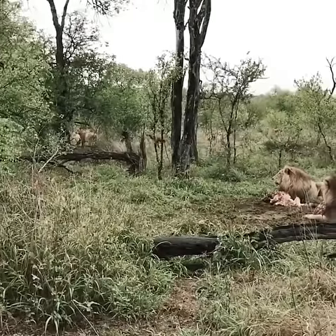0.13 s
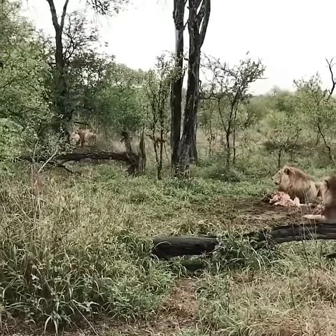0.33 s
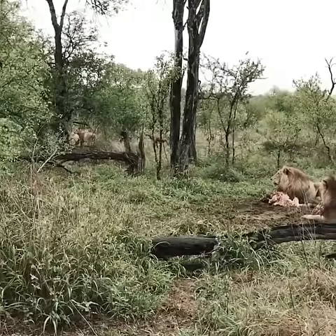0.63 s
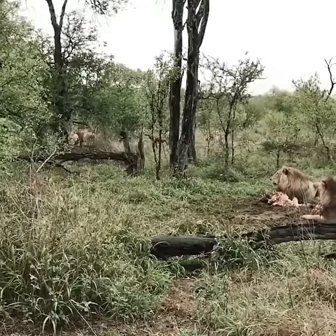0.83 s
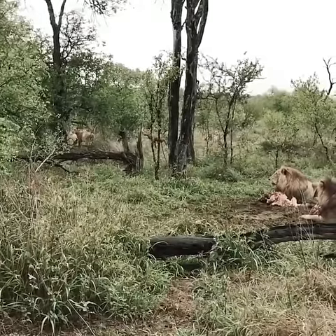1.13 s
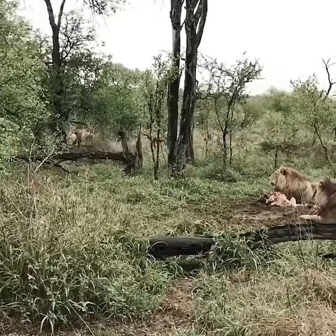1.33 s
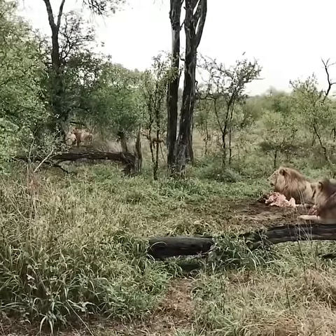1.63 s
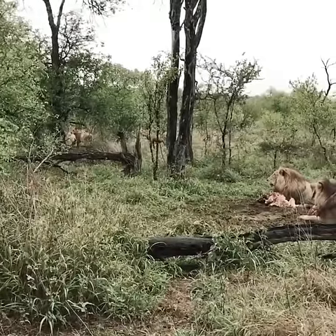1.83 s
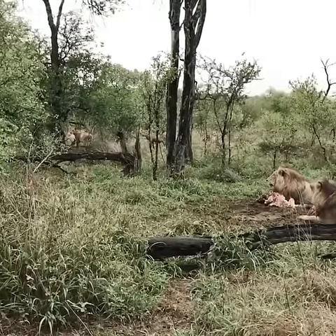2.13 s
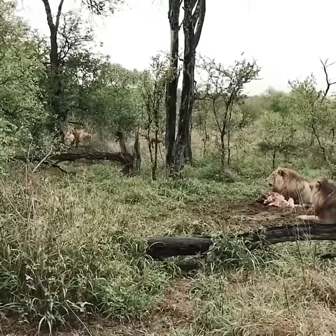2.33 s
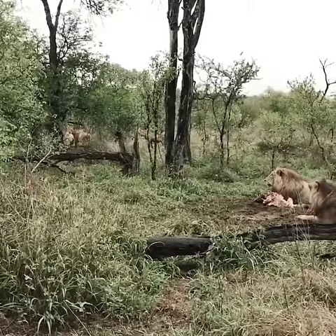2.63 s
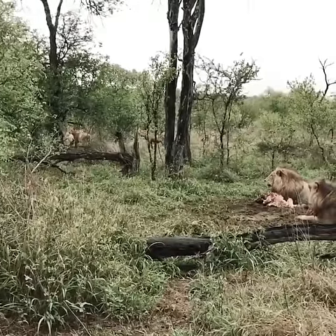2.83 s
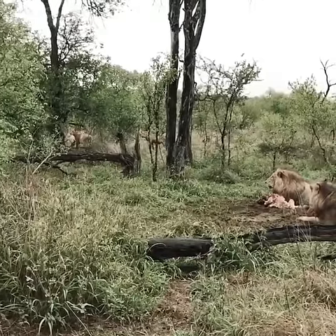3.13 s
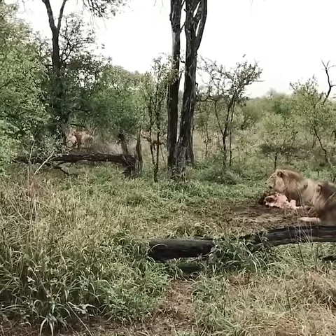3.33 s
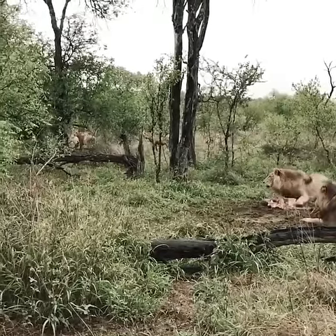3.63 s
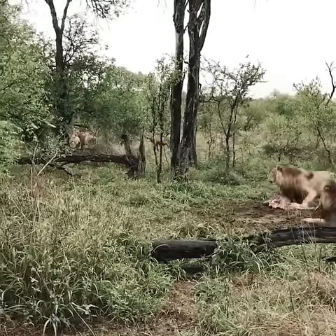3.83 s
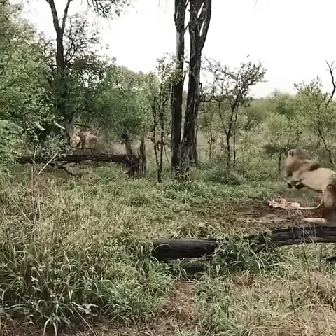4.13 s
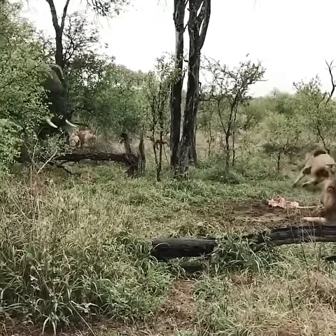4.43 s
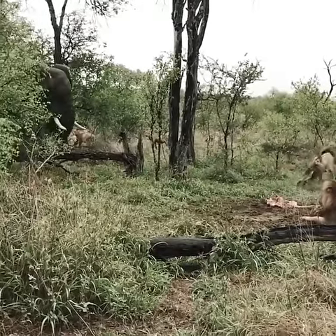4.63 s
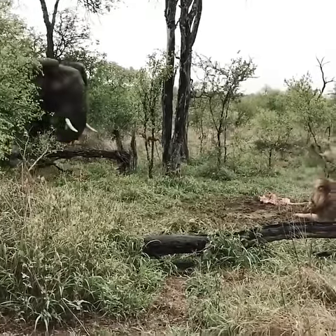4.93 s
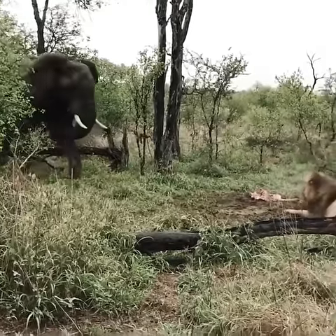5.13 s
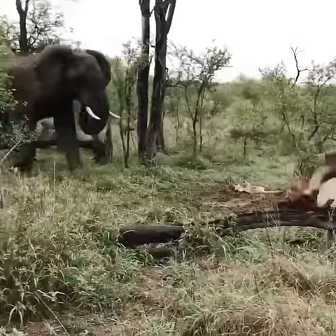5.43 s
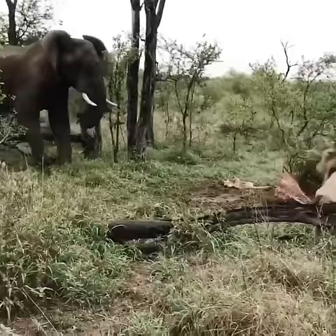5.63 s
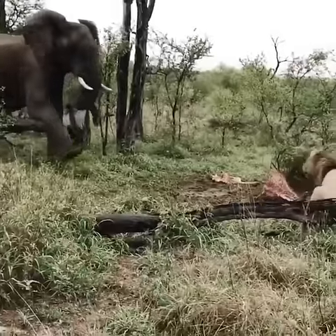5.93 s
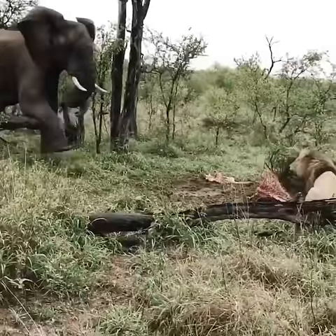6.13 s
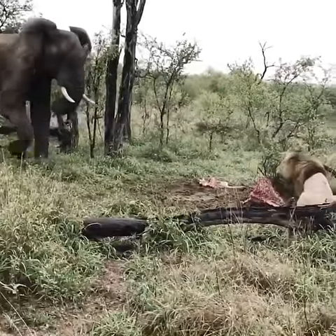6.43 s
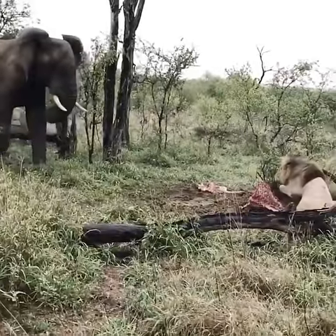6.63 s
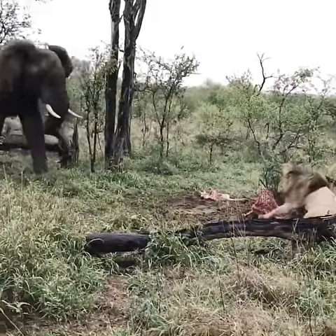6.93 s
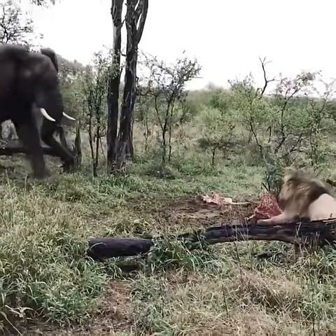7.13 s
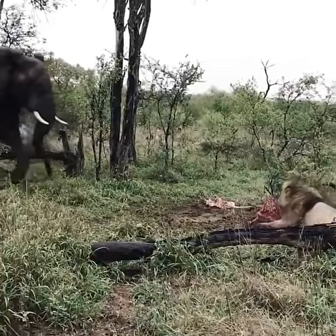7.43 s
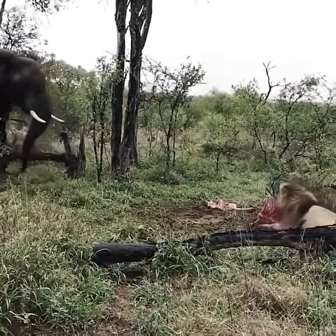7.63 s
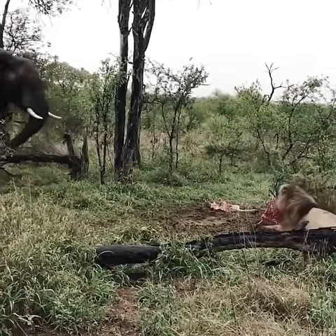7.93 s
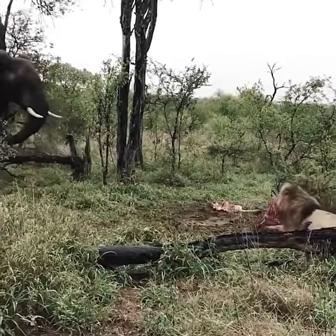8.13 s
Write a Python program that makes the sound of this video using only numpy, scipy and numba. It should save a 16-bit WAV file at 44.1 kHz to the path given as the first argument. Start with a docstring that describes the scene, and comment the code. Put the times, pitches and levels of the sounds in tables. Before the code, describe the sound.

Small birds whistle and trill over quiet bush air, then feeding lions growl in slow deep pulses and one gives a loud rough snarl amid rustling grass.

```python
"""Lions at a carcass in the bush growl in slow, deep pulses and give one loud snarl as an elephant pushes in.
Each growl is a run of vocal-fold beats that thump the chest and ring throat and mouth; the snarl is a
rough pulse train through moving resonances. Grass is a crackle of small contacts and twigs are damped
resonances struck by a crack. Birds whistle and trill in gliding partials, over soft air and low rumble."""
import sys
import numpy as np
from scipy import signal
from scipy.fft import rfft, irfft, next_fast_len
from scipy.io import wavfile
from scipy.ndimage import map_coordinates
from numba import njit

SR = 44100
rng = np.random.default_rng(int(sys.argv[2]) if len(sys.argv) > 2 else 0)


def put_to_file(sound):
    """Save the sound as 16-bit audio at rate SR, in the file named by the first command-line argument."""
    columns = np.atleast_2d(sound).T  # one column per channel
    safe = np.clip(columns, -1, 1)
    whole_steps = np.round(safe * 32767)
    wavfile.write(sys.argv[1], SR, whole_steps.astype(np.int16))


N = 364707
TIME = np.arange(N) / SR

# Shape of the growling mouth. Each row: time in seconds, jaw resonance in Hz, lip resonance in Hz.
MOUTH_SHAPE = [(3.64, 560, 1400), (3.83, 526, 1180), (6.28, 553, 1104), (6.36, 523, 1005),
               (6.51, 560, 1203), (6.535, 560, 970), (6.8, 626, 1114), (7.45, 634, 1170)]


def from_db(db):
    """Level law: 20 dB is a factor of ten in amplitude."""
    return 10 ** (np.asarray(db) / 20)


def rms_one(x):
    """Normalisation: scale to unit root-mean-square amplitude."""
    return x / np.sqrt(np.mean(x ** 2) + 1e-20)


def in_time(rows):
    """Linear interpolation: each column of a curve at every sample."""
    s, *columns = np.transpose(rows)
    return [np.interp(TIME, s, c) for c in columns]


def add(out, s, sound):
    """Superposition: mix a sound in at time s."""
    i = int(np.clip(s * SR, 0, N - 1))
    out[i:i + len(sound)] += sound[:N - i]


def cut(x, hz, kind, order=2):
    """Butterworth filtering: a passband that is maximally flat."""
    edges = np.clip(hz, 10, .45 * SR)
    return signal.sosfilt(signal.butter(order, edges, kind, fs=SR, output="sos"), x)


def drift(per_s):
    """Band-limited chance: a smooth curve through per_s random knots a second."""
    knots = rng.standard_normal(N // 20)
    return map_coordinates(knots, [TIME * per_s], order=2, mode="wrap")


def coloured(x, spectrum):
    """Spectral shaping: weight the Fourier bins of a steady sound, with falling skirts; rms 1."""
    hz, db = np.transpose(spectrum)
    size = next_fast_len(N)
    bins = np.maximum(np.fft.rfftfreq(size, 1 / SR), 1)
    skirts = np.minimum(1, bins / hz[0]) ** 2 * np.minimum(1, hz[-1] / bins) ** 2
    gain = from_db(np.interp(np.log(bins), np.log(hz), db)) * skirts
    return rms_one(irfft(rfft(x, size) * gain, size)[:N])


def resonate(x, modes):
    """Modal superposition: parallel two-pole resonances of alternating sign."""
    out = 0
    for k, (hz, width, db) in enumerate(modes):
        r = np.exp(-np.pi * width / SR)
        top = (-1) ** k * from_db(db) * (1 - r * r) / 2
        poles = [1, -2 * r * np.cos(2 * np.pi * hz / SR), r * r]
        out = out + signal.lfilter([top, 0, -top], poles, x + 1e-18)
    return out


@njit
def gliding(x, hz, width):
    """Time-varying resonance: a two-pole filter whose centre moves; gain 1 on top."""
    out, r = np.zeros(len(x)), np.exp(-np.pi * width / SR)
    for i in range(2, len(x)):
        drive = (1 - r * r) / 2 * (x[i] - x[i - 2])
        out[i] = drive + 2 * r * np.cos(2 * np.pi * hz[i] / SR) * out[i - 1] - r * r * out[i - 2]
    return out


def evened(x, window_s):
    """Level control: divide by the short-term rms; pauses stay quiet."""
    window = np.hanning(int(window_s * SR) + 3)
    power = signal.fftconvolve(x * x, window / window.sum(), "same")
    return x / np.sqrt(np.abs(power) + .1 * np.mean(x * x))


def swell(s, rise_s, fall_s, db, hold_s=0):
    """Envelope: gain that arches up to db at time s, holds and dies away; 20 dB per rise or fall time."""
    early, late = np.maximum(s - TIME, 0), np.maximum(TIME - s - hold_s, 0)
    return from_db(db - 20 * np.minimum((early / rise_s) ** 2 + late / fall_s, 10))


def strongest(gains):
    """Masking by the maximum: where gestures overlap, the strongest one leads."""
    return np.max(list(gains), axis=0)


def growl(throat_db=-2.0, mouth_db=-2.5, rasp_db=-23.5, rattle_per_s=300, stray=0.98):
    """Source and filter: slow beats of slack vocal folds thump the chest and ring throat and mouth."""
    # Each row is one run of beats: first and last beat in seconds, number of beats, first gap over last gap,
    # swell in seconds, chest peak in dB, throat in dB, mouth in dB relative to throat, chest fade in dB per s,
    # chest decay constant in seconds, mean chest pitch in Hz, raggedness 0 to 1.
    runs = [(3.298, 3.518, 7, 1.13, .18, -27.5, -54.5, -18, -3, 0.0065, 108, .05),
            (3.567, 3.669, 4, 0.99, 0.0085, -24.5, -52, -6, 10.5, 0.0089, 94, .05),
            (3.823, 4.037, 6, 1.05, 0.0062, -33, -58, -9, 2.5, .01, 98.3, 0.2),
            (4.145, 4.65, 12, 0.93, 0.104, -36.5, -65, -25, -0.5, 0.013, 91.6, 0.42),
            (4.736, 5.134, 9, 1.03, 0.0042, -37.5, -65, -14, 1, 0.014, 93.6, 0.34),
            (6.179, 6.333, 8, 0.9, 0.083, -29, -40, -15.5, -4, 0.015, 118.5, 0.95),
            (6.354, 6.633, 10, .95, 0.0018, -27, -43, -11, -1.5, 0.013, 102, 0.52),
            (6.669, 7.035, 11, .85, 0.0032, -27, -46, -10.5, 7.5, 0.017, 100.4, .25),
            (7.067, 7.488, 11, 0.83, 0.003, -30.5, -49.5, -20.5, 1, 0.02, 102.6, 0.15),
            (7.735, 7.788, 2, 1, 0.039, -40, -82, 0, -2, 0.013, 90, 0.06),
            (8.04, 8.074, 2, 1, 0.038, -37.5, -73, -20.5, 0, .02, 85, 0.05)]
    throat_fades = 5  # as the effort runs out, the throat fades this many times faster than the chest
    last_beat_db = -4  # the closing beat of a run is weaker
    chest, slaps, throat_gain, mouth_gain = np.zeros((4, N))
    for (first, last, count, gap_ratio, swell_s, chest_level, throat_level, mouth_level,
         fade_db, ring_s, chest_hz, ragged) in runs:
        push = effort(first, last, swell_s, throat_level, throat_fades * fade_db)
        heave = effort(first, last, swell_s, chest_level, fade_db)
        throat_gain = np.maximum(throat_gain, push)
        mouth_gain = np.maximum(mouth_gain, push * from_db(mouth_level))
        for k, s in enumerate(beat_times(first, last, count, gap_ratio), 1):
            size, tension, late = rng.standard_normal(3)
            strength = from_db((2 + 2 * ragged) * size + last_beat_db * (k == count))
            pitch = chest_hz * (1 + (.02 + .08 * ragged) * tension)
            # each beat trails a stray one, stronger in ragged runs
            stray_beat = (s + rng.uniform(.012, .03), stray * ragged * rng.random())
            for at, share in ((s + .002 * ragged * late, 1), stray_beat):
                # a light stray beat hardly moves the chest
                force = strength * share ** 2 * heave[int((at + .008) * SR)]
                add(chest, at, force * thump(ring_s, pitch))
                add(slaps, at, strength * share * slap(puff=.08, puff_s=.005))
    # under strain, loose tissue also rattles between the beats
    strain = (throat_gain / throat_gain.max()) ** 2
    slaps += .5 * strain * rng.standard_normal(N) * (rng.random(N) < rattle_per_s / SR)
    throat, mouth = (evened(part, .12) for part in mouth_parts(slaps, *in_time(MOUTH_SHAPE)))
    rasp = evened(rasp_part(slaps), .12)
    upper = throat_gain * (from_db(throat_db) * throat + from_db(rasp_db) * rasp)
    return cut(chest, 47.5, "high", order=3) + upper + mouth_gain * from_db(mouth_db) * mouth


def beat_times(first, last, count, gap_ratio):
    """Geometric progression: the gaps between beats change smoothly over the run."""
    gaps = np.geomspace(gap_ratio, 1, round(count) - 1)
    return first + (last - first) * np.append(0, np.cumsum(gaps)) / gaps.sum()


def effort(first, last, swell_s, db, fade_db):
    """Breath-driven envelope of one growl: it swells, drifts at its fade rate and is released at the end."""
    onset_db, release_s = 24.5, 0.056  # start below full level; time to die by 20 dB
    onset = onset_db * np.clip(1 - (TIME - first) / swell_s, 0, 1)
    fade = fade_db * np.clip(TIME - first - swell_s, 0, last - first)
    return swell(first, .02, release_s, db - onset - fade, hold_s=last - first)


def slap(puff, puff_s):
    """Impulsive excitation: the folds slap shut, and a puff of turbulent air follows."""
    t = np.arange(SR // 8) / SR
    return (t == 0) + puff * rng.standard_normal(len(t)) * np.exp(-t / puff_s)


def thump(decay_s, chest_hz, snap_hz=250, settle_s=0.0032, belly_hz=62, belly_db=-5):
    """Damped oscillation: tight at first, sinking at once to the chest pitch, above a slower belly heave."""
    t = np.arange(SR // 8) / SR
    hz = chest_hz + (snap_hz - chest_hz) * np.exp(-t / settle_s)
    chest = np.sin(2 * np.pi * np.cumsum(hz) / SR)
    belly_pitch = belly_hz * (1 + 0.13 * rng.standard_normal())
    belly = from_db(belly_db) * np.sin(2 * np.pi * belly_pitch * t)
    wave = (chest - belly) * (1 - np.exp(-t / .0055)) ** 2 * np.exp(-t / decay_s)
    return wave / np.abs(wave).max()


def mouth_parts(x, jaw_hz, lip_hz):
    """Formants: the slapping folds ring the low throat and jaw, and the brighter lips."""
    # Each row: throat resonance in Hz, width in Hz, level in dB.
    throat_modes = [(296.4, 73, 3), (360.7, 62, 2)]
    jaw_width_hz, jaw_db, lip_width_hz = 51.0, -8.5, 54.0
    low = resonate(x, throat_modes) + from_db(jaw_db) * gliding(x, jaw_hz, jaw_width_hz)
    throat = cut(low, [250, 720], "band", order=3)
    return throat, cut(gliding(x, lip_hz, lip_width_hz), [850, 1600], "band")


def rasp_part(x):
    """Upper formants: the high resonances of the mouth."""
    # Each row: resonance in Hz, width in Hz, level in dB.
    upper_tract = [(1400, 130, -0.5), (2040, 53, 7), (2710, 53, 2.5), (3500, 550, -2.5)]
    return cut(resonate(x, upper_tract), [1300, 4500], "band")


def barks(rasp_db=-23):
    """Impulse response: now and then the folds slap much harder and the tract rings on its own."""
    # Each row: start in seconds, throat peak in dB, mouth in dB relative to throat.
    hard_slaps = [(3.483, -50, -30), (3.634, -50.5, -5), (3.822, -47, -6), (6.208, -41.5, -17),
                  (6.268, -34, -20), (6.355, -31, -16), (6.416, -30.5, -16), (6.504, -39.5, -3),
                  (6.531, -37, -4.5)]
    out, (jaw_hz, lip_hz) = np.zeros(N), in_time(MOUTH_SHAPE)
    for s, db, mouth_db in hard_slaps:
        i, hit = int(s * SR), slap(puff=0.08, puff_s=0.014)
        parts = (*mouth_parts(hit, jaw_hz[i:], lip_hz[i:]), rasp_part(hit))
        throat, mouth, rasp = (part / np.abs(part).max() for part in parts)
        add(out, s, from_db(db) * (throat + from_db(mouth_db) * mouth + from_db(rasp_db) * rasp))
    return out


def snarl(voice_db=-2.0, chest_db=-0.5, jaw_db=6, jaw_width_hz=68, lip_db=0, lip_width_hz=90, hiss_db=-25.5):
    """Source and filter: unsteady fold pulses and pulsing breath noise pass through moving jaw and lips."""
    # From first cough to last grunt. Each row: time in seconds, rise, hold and fall in seconds,
    # voice level in dB, chest level in dB, both before voice_db and chest_db.
    thrusts = [(5.492, 0.07, 0.0042, 0.27, -44.5, -49), (5.548, 0.046, 0.0066, 0.11, -32.5, -41.5),
               (5.635, 0.067, 0.0311, 0.055, -24.5, -35.5), (5.7, 0.029, 0.026, 0.027, -25, -42),
               (5.764, .1, 0.026, 0.33, -49, -53.5), (5.851, 0.02, 0.0094, 0.032, -50, -44)]
    # Each row: time in seconds, jaw resonance in Hz, lip resonance in Hz.
    jaw_and_lips = [(5.48, 600, 960), (5.545, 524, 1040), (5.6, 530, 960), (5.645, 798, 850),
                    (5.7, 706, 1090), (5.735, 606, 980), (5.8, 698, 1020)]
    # Steady resonances of the tract. Each row: frequency in Hz, width in Hz, level in dB.
    steady_tract = [(371, 19, 0), (560, 100, -6), (1480, 125, -6.5), (1796, 350, -19), (2210, 40, -15)]
    slack_hz, tight_hz = 165.6, 189  # the mean pitch arches from slack to tight and back
    crest_s, arch_s = 5.65, 0.055  # top of that arch and its half width
    rough_slack, rough_tight = 0.6, 0.22  # the voice clears as it is forced
    voice_gain = strongest(swell(s, rise, fall, db, hold) for s, rise, hold, fall, db, _ in thrusts)
    chest_gain = strongest(swell(s, rise, fall, db, hold) for s, rise, hold, fall, _, db in thrusts)
    force = voice_gain / voice_gain.max()
    pitch = slack_hz + (tight_hz - slack_hz) * np.exp(-((TIME - crest_s) / arch_s) ** 2)
    rough = np.clip(rough_slack + (rough_tight - rough_slack) * force, 0, 1)
    turns = np.cumsum(pitch * (1 + .1 * rough * drift(130))) / SR
    # one pulse per whole turn, uneven in strength
    pulses = rms_one(np.diff(np.floor(turns), prepend=0) * from_db(3.5 * drift(110)))
    rasp = rms_one(rng.standard_normal(N) * (1 + np.cos(2 * np.pi * turns)))
    source = pulses * (1 - rough) + rough * rasp
    jaw_hz, lip_hz = in_time(jaw_and_lips)
    lips = from_db(lip_db) * gliding(source, lip_hz, float(lip_width_hz))
    jaws = from_db(jaw_db) * gliding(source, jaw_hz, float(jaw_width_hz))
    # the steady resonances only open at full force
    tract = cut(lips - jaws, 1200, "low", order=6) + force * resonate(source, steady_tract)
    voice = evened(cut(tract, [300, 2600], "band"), .04)
    hiss = from_db(hiss_db) * rms_one(cut(rasp, [1800, 4000], "band"))
    chest = evened(cut(resonate(rasp, [(116.3, 250, 0)]), [60, 190], "band"), 0.056)
    return (voice + hiss) * voice_gain * from_db(voice_db) + chest * chest_gain * from_db(chest_db)


def grass(blades_db=2.2, stems_db=-1.0, branch_db=2.0):
    """Friction noise: blades swish, stems crunch, a leafy branch is dragged and a stick strains."""
    # Animals push through grass. Each row: time in seconds, rise and fall in seconds, blades in dB,
    # stems in dB, before the trims blades_db and stems_db.
    swishes = [(3.9, 0.56, 2.3, -67, -64.5), (4.38, 0.32, 0.71, -62, -61.5), (5.1, 0.24, 0.76, -64.5, -64),
               (5.359, 0.065, 0.34, -58.5, -56), (5.648, 0.38, 1.05, -53.5, -51.5),
               (6.32, 0.19, 0.64, -61, -60), (7.53, 0.54, 0.52, -65, -62.5),
               (8.2, 0.56, 0.66, -73.5, -69.5)]
    # A leafy branch drags, then whips free. Each row: time, rise and fall in seconds, level in dB
    # before branch_db.
    branch_strokes = [(7.396, 0.19, 0.14, -60.5), (7.55, 0.096, 0.38, -53.5), (7.651, 0.014, .014, -48)]
    # A stick crackles as it bends and gives way: time, rise and fall in seconds, level in dB.
    stick_bend = (3.088, .045, 0.06, -50)
    # Spectra. Each row: frequency in Hz, density in dB per Hz.
    blade_spectrum = [(1200, -4), (2500, 5), (4000, -1), (6000, -0.5), (9000, -1.5), (10500, -6.5),
                      (11700, -1.5), (14000, -6)]
    stem_spectrum = [(150, 4), (400, 7.5), (900, 17), (1800, 10), (2500, -5.5), (3200, 13.5), (4200, 11)]
    branch_spectrum = [(1500, -23), (3000, -7), (3800, 5.5), (4350, 3), (5200, -6), (9000, -18)]
    wood_spectrum = [(500, -1), (1000, 3), (3200, -2), (7000, -9), (13000, -26)]
    branch_free_s = 7.667  # the branch slips free and falls silent
    blades_gain = strongest(swell(s, rise, fall, db + blades_db) for s, rise, fall, db, _ in swishes)
    stems_gain = strongest(swell(s, rise, fall, db + stems_db) for s, rise, fall, _, db in swishes)
    held = np.clip((branch_free_s - TIME) / 0.01, 0, 1)
    branch_gain = from_db(branch_db) * strongest(swell(*stroke) for stroke in branch_strokes) * held
    blades = coloured(crackle(per_s=3500, size_db=3.2, hiss=1.1), blade_spectrum)
    stems = coloured(crackle(per_s=700, size_db=3.5, hiss=.8), stem_spectrum)
    branch = coloured(crackle(per_s=770, size_db=-5.0, hiss=0.83), branch_spectrum)
    stick = coloured(crackle(per_s=2300, size_db=6.5, hiss=0.77), wood_spectrum)
    return blades_gain * blades + stems_gain * stems + branch_gain * branch + swell(*stick_bend) * stick


def crackle(per_s, size_db, hiss):
    """Shot noise: countless small contacts of uneven size, in clumps, with a hiss that clumps too."""
    sizes = from_db(size_db * np.minimum(rng.exponential(1, N), 5)) * rng.choice([-1, 1], N)
    grains = rms_one(sizes * (rng.random(N) < per_s / SR))
    return (grains + hiss * rng.standard_normal(N)) * from_db(1.8 * drift(45))


def twigs(splinter=0.27, splinter_s=0.0041, damping=0.91, crack_s=0.0035):
    """Brittle fracture: a sharp crack, and splintering fibres that ring the heavily damped wood."""
    # Each row: start in seconds, wood peak in dB, ring in Hz, crack in dB relative to the wood.
    breaks = [(3.081, -31, 2400, -15), (3.125, -41.5, 1023, 5.5), (3.455, -43.5, 800, -27),
              (3.908, -41, 610, -21), (4.574, -46.5, 1530, -1), (5.228, -41.5, 291.5, -17),
              (5.3026, -52.5, 3600, 10.5), (6.658, -33.5, 1400, -18.5), (7.024, -47.5, 5200, -14),
              (7.806, -53.5, 3070, 6)]
    out, t = np.zeros(N), np.arange(SR // 16) / SR
    for s, db, hz, crack_db in breaks:
        fibres = (t == 0) + splinter * rng.standard_normal(len(t)) * np.exp(-t / splinter_s)
        wood = cut(resonate(fibres, [(hz, damping * hz, 0)]), [hz / 2, hz * 1.08], "band", order=1)
        fading = np.exp(-t / crack_s) + 0.45 * np.exp(-t / 0.026)
        crack = cut(rng.standard_normal(len(t)) * fading, [2500, 10000], "band", order=1)
        crack_part = from_db(crack_db) * crack / np.abs(crack).max()
        add(out, s, from_db(db) * (wood / np.abs(wood).max() + crack_part))
    return out


def note(length, start_hz, end_hz, partials, waver):
    """Frequency modulation: one bird note whose harmonics glide together, with soft ends."""
    u = np.linspace(0, 1, int(max(length, .01) * SR))
    wobble = np.interp(u, np.linspace(0, 1, 48), rng.standard_normal(48))
    hz = start_hz * (end_hz / start_hz) ** u * (1 + waver * wobble)
    phase = 2 * np.pi * np.cumsum(hz) / SR
    return np.sin(np.pi * u) * sum(from_db(db) * np.sin(k * phase) for k, db in partials)


def whistles():
    """Nearly sinusoidal tones: pure slurs from small songbirds, and a repeated two-part upsweep."""
    # Each row: start in seconds, length in seconds, start in Hz, end in Hz, level in dB before the partials.
    slurs = [(0.0, 0.061, 2410, 2060, -69), (0.258, 0.11, 2500, 2384, -70.5),
             (.75, 0.11, 2780, 2766, -79.5), (0.888, 0.08, 2130, 2190, -72), (1.24, 0.074, 4000, 6170, -66),
             (1.266, 0.098, 2500, 2376, -64), (1.47, 0.036, 4560, 4300, -69),
             (1.52, 0.032, 4050, 3910, -61), (1.568, 0.042, 2510, 2256, -64),
             (1.61, 0.022, 6770, 4300, -68), (1.711, 0.032, 4720, 5100, -62.5),
             (1.768, 0.064, 6070, 6260, -71), (1.857, 0.048, 6400, 7900, -69.5),
             (3.85, 0.02, 3290, 2930, -53.5), (6.926, 0.038, 2500, 2190, -63.5),
             (6.984, 0.037, 2370, 2176, -68), (7.584, 0.029, 2540, 2190, -63)]
    # Each row: start in seconds, level in dB before the partials.
    upsweeps = [(1.984, -64), (2.08, -65), (2.173, -65.5), (2.264, -64.5)]
    out, pure = np.zeros(N), [(1, 6.5), (2, -15.5)]  # (harmonic number, dB)
    for s, length, start_hz, end_hz, db in slurs:
        add(out, s, from_db(db) * note(length, start_hz, end_hz, pure, waver=0.017))
    for s, db in upsweeps:
        add(out, s, from_db(db) * note(0.035, 3600, 5550, pure, waver=0.036))
        add(out, s + 0.029, from_db(db - 8.5) * note(0.026, 6100, 8000, pure, waver=.01))
    return out


def trills(top_hz=1850, bottom_hz=1330, lead_lift=0.0692, length_s=.042):
    """Harmonic series: a farther bird opens high and runs on in lower, hoarser, less even falling notes."""
    # Each row: first and last time in seconds, notes per second, level in dB before the partials,
    # fade in dB per second (negative grows).
    runs = [(0.982, 1.56, 17.1, -57, 15), (1.626, 2.25, 17.2, -58, 10.5), (2.337, 2.92, 14.4, -53.5, 16),
            (2.99, 3.50, 15.7, -57.5, 6.5), (3.768, 4.35, 14, -55.5, 8), (4.931, 5.22, 22, -66.5, -28),
            (6.869, 7.27, 20, -67, 26)]
    # Each row: harmonic number, level in dB in the opening note.
    opening_partials = [(1, -16), (2, -0.5), (3, -14), (4, -14.5), (5, -17.5)]
    out = np.zeros(N)
    for first, last, per_s, db, fade_db in runs:
        for k, s in enumerate(np.arange(first, last, 1 / per_s)):
            hoarse = min(.025 + .02 * k, .12)
            late, sharp = hoarse * rng.standard_normal(2)
            lift = 1 + lead_lift / (1 + k * k) + .3 * sharp
            # every partial but the second weakens from note to note
            partials = [(n, level - 0.49 * k * (n != 2)) for n, level in opening_partials]
            sound = note(length_s, top_hz * lift, bottom_hz * np.sqrt(lift), partials, hoarse)
            add(out, s + .07 * late, from_db(db - fade_db * (s - first)) * sound)
    return out


def bush(x, t60, dull_hz):
    """Diffuse scattering: trunks and leaves send a thin, dull, exponentially dying tail back."""
    t = np.arange(SR) / SR
    noise = cut(rng.standard_normal(SR), dull_hz, "low", order=1)
    tail = noise * from_db(-60 * t / t60) * (1 - np.exp(-t / 0.0031)) ** 2
    return signal.fftconvolve(x, tail / np.linalg.norm(tail))[:N]


def rumble():
    """Low-frequency noise: distant rumble in slow swells."""
    # Each row: time in seconds, rise and fall in seconds, level in dB.
    swells = [(1.6, 0.55, 1.6, -68.5), (2.08, 0.25, 0.25, -60), (8.0, 7.14, 10, -58)]
    # Each row: frequency in Hz, density in dB per Hz.
    rumble_spectrum = [(30, -12), (70, -3), (130, -15), (500, -30)]
    return strongest(swell(*row) for row in swells) * coloured(rng.standard_normal(N), rumble_spectrum)


def air(level_db=-68):
    """Stationary noise: a steady soft bed, weaker towards the treble."""
    # Each row: frequency in Hz, density in dB per Hz.
    air_spectrum = [(40, 2.5), (60, 0.5), (130, -0.5), (250, -4.5), (500, -10), (1400, -15), (2400, -12),
                    (3300, -19), (7000, -25.5), (14000, -26)]
    return from_db(level_db) * coloured(rng.standard_normal(N), air_spectrum)


def scene():
    """Direct and scattered sound: lions and breaking wood are near; birds sound through the trees."""
    growls, snarling, wood, song, trill = growl() + barks(), snarl(), twigs(), whistles(), trills()
    lions = growls + from_db(-17) * bush(growls, t60=0.63, dull_hz=2500)
    lions += snarling + from_db(-12.0) * bush(snarling, t60=0.55, dull_hz=4000)
    plants = grass() + wood + from_db(-15.5) * bush(wood, t60=1.0, dull_hz=5070)
    birds = song + from_db(-10.0) * bush(song, t60=0.64, dull_hz=7000)
    birds += from_db(1.0) * trill + from_db(-3) * bush(trill, t60=0.83, dull_hz=7160)
    return (lions + plants + birds + rumble() + air())[None]


def record(dry):
    """Elliptic low-pass filtering: the top is cut steeply."""
    cutoff_hz = 14000
    return signal.sosfilt(signal.ellip(12, .1, 80, cutoff_hz, fs=SR, output="sos"), dry)


dry = scene()
out = record(dry)
put_to_file(out)
```